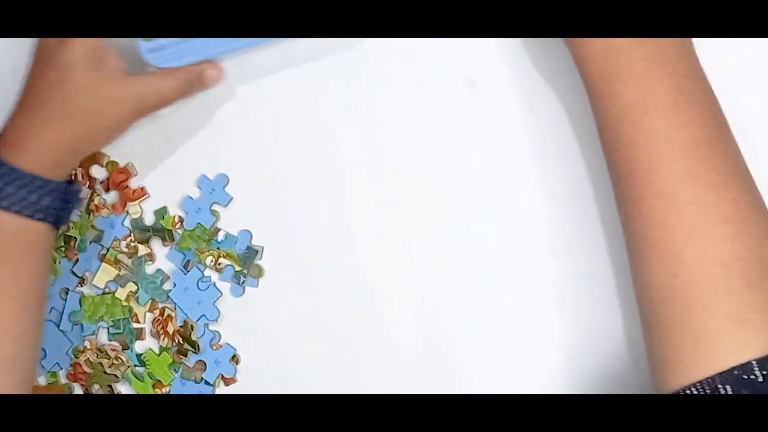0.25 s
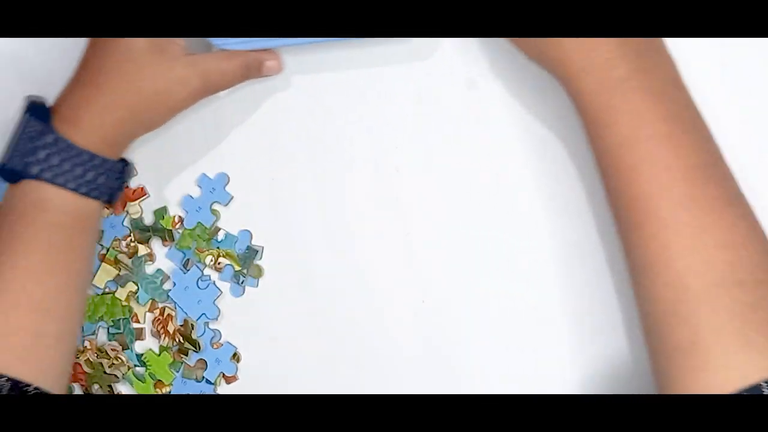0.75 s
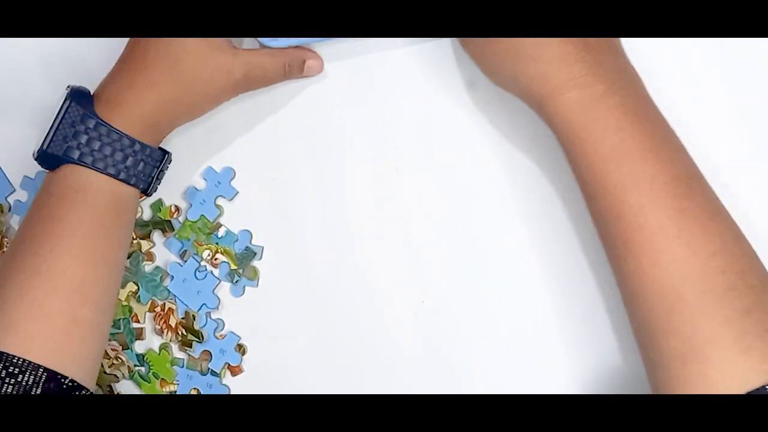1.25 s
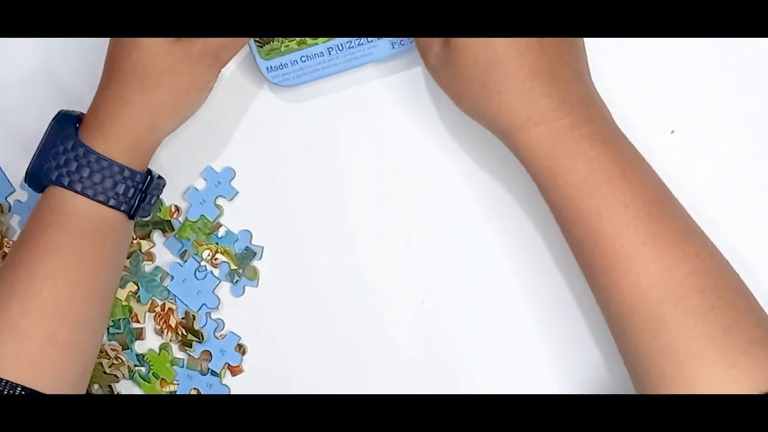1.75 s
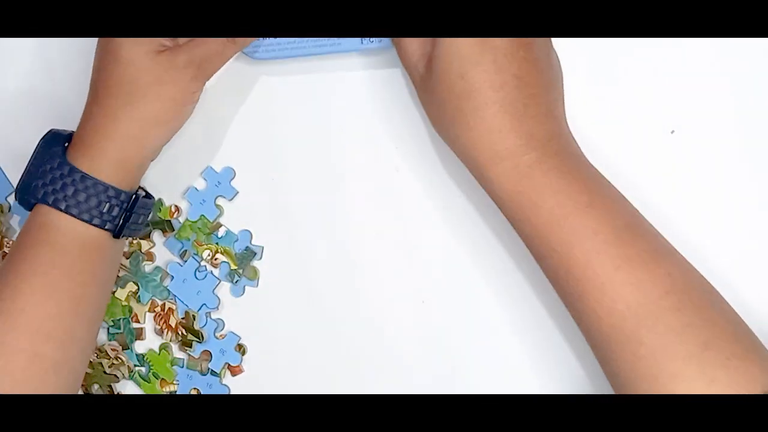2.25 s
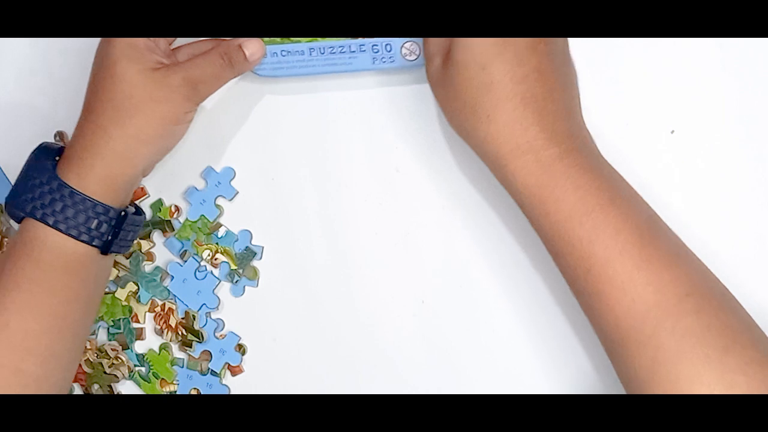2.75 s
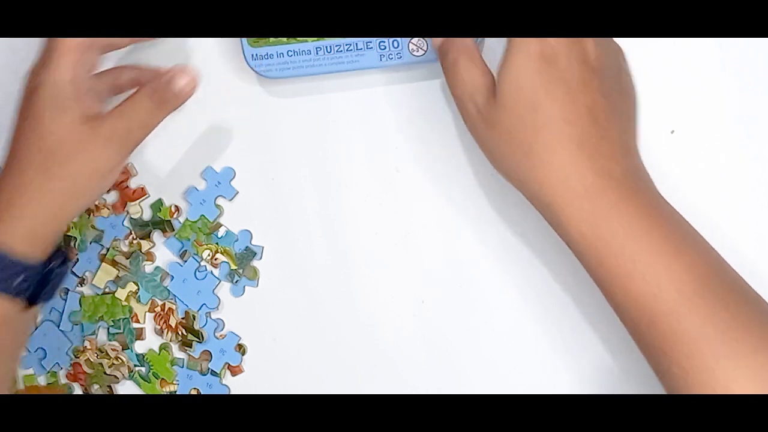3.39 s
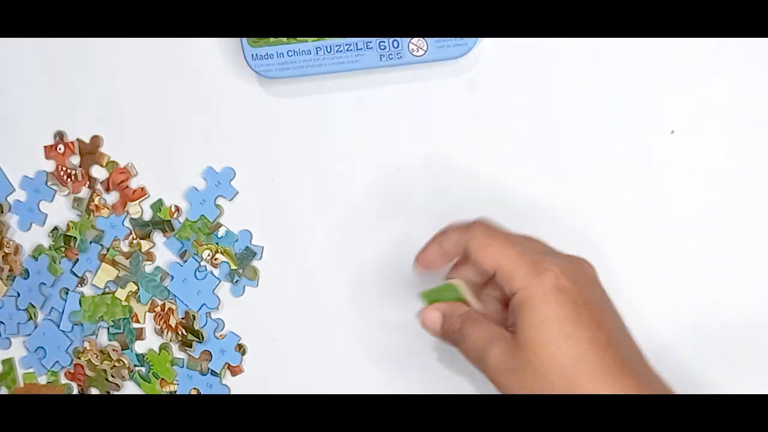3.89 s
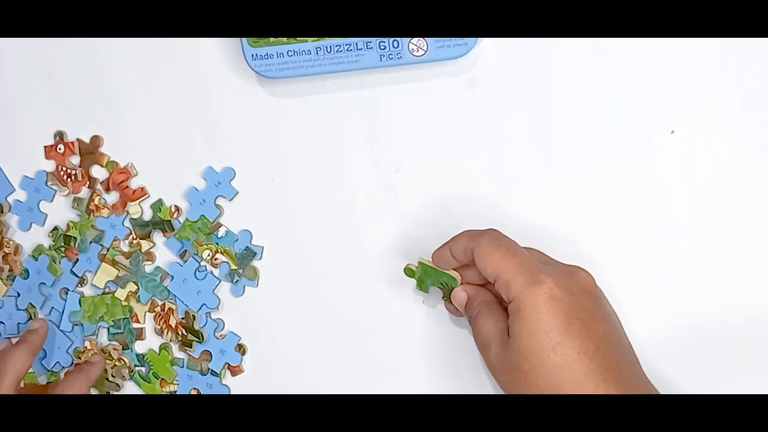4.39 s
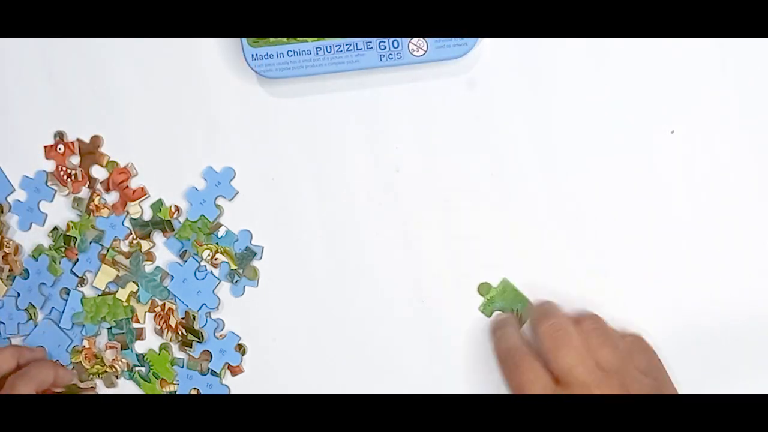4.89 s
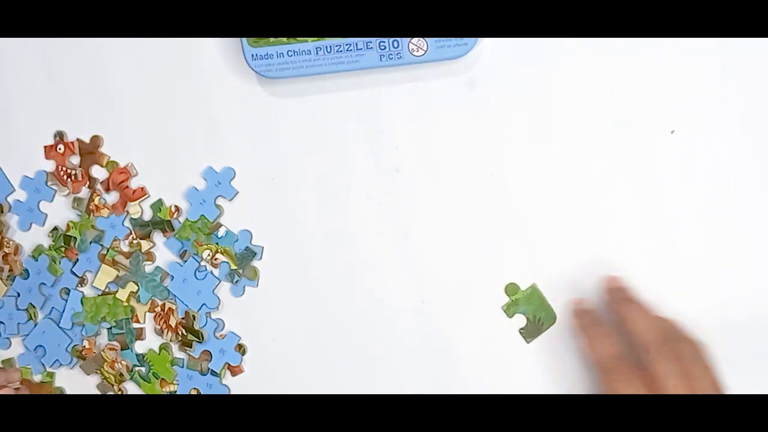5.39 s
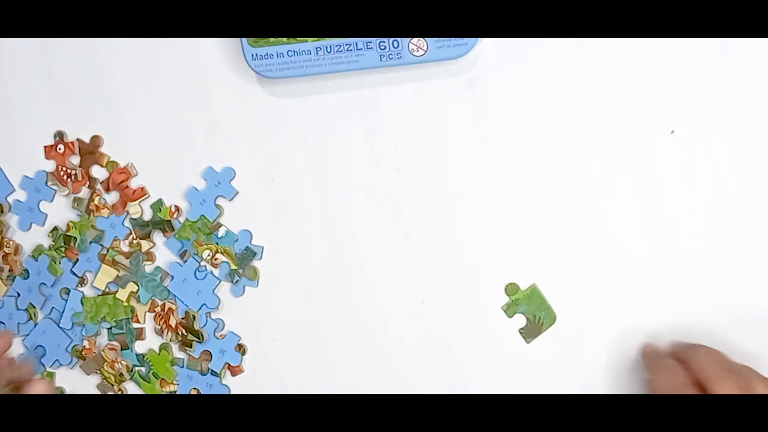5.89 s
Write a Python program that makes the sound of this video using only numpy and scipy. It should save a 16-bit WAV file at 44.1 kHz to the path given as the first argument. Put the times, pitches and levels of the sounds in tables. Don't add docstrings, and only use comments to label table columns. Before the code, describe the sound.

A close microphone on the table catches thin tin clanking irregularly in two hands, each knock ringing with a slightly different colour. Soft scraping and low thumps from leaning arms run beneath. Then the metal stops, leaving light finger rubs, a cluster of dead cardboard clicks, near quiet, and a last flat tap in a lightly reverberant room.

```python
import sys
import numpy as np
from scipy import signal
from scipy.fft import rfft, irfft, next_fast_len
from scipy.io import wavfile
from scipy.ndimage import uniform_filter1d

SR = 44100
rng = np.random.default_rng(int(sys.argv[2]) if len(sys.argv) > 2 else 0)


def how_loud(loudness_db):
    steps = np.asarray(loudness_db, float) / 20
    return 10 ** steps


def digitize_waveform(pressure):
    field = np.atleast_2d(pressure).T
    bounded = np.clip(field, -1, 1)
    quanta = np.round(bounded * 32767).astype(np.int16)
    wavfile.write(sys.argv[1], SR, quanta)


N = 270763

HARD_BLOW_HZ = [60, 220, 1000, 2700, 7000, 8600, 15000]


def evened(x):
    return x / np.sqrt(np.mean(x ** 2) + 1e-20)


def add(mix, start_s, sound):
    part = mix[round(start_s * SR):][:len(sound)]
    part += sound[:len(part)]


def coloured(x, points, size=4096):
    points_hz, points_db = np.transpose(points)
    hz = abs(np.fft.fftfreq(size, 1 / SR))
    gain_db = np.interp(np.log(hz + 1), np.log(points_hz + 1), points_db)
    spectrum = np.exp(np.conj(signal.hilbert(np.log(how_loud(gain_db)))))
    taps = np.fft.ifft(spectrum).real[:size // 2]
    return signal.oaconvolve(x, taps)[:len(x)]


def resonated(x, peaks):
    hz = np.fft.rfftfreq(len(x), 1 / SR)
    gain = sum(how_loud(db) / (1 + 2j * (hz - f) / max(width, 8, f / 45)) for f, width, db in peaks)
    return irfft(rfft(x) * gain, len(x))


def dying(x, t60_points, factor):
    t, hz = np.arange(len(x)) / SR, np.fft.rfftfreq(len(x), 1 / SR)
    centres, t60s = np.transpose(t60_points)
    spectrum = rfft(x)
    out = np.zeros(len(x))
    for one_band, t60 in zip(np.eye(len(centres)), t60s):
        share = np.interp(np.log(hz + 1), np.log(centres), one_band)
        out += irfft(spectrum * share, len(x)) * how_loud(-60 * t / max(t60 * factor, .005))
    return out


def air():
    # hz, level_db per Hz
    density = [(20, -100), (50, -91.5), (100, -100), (200, -99), (500, -108), (1000, -115), (2000, -119),
               (4000, -121), (8000, -122), (16000, -122)]
    return coloured(rng.standard_normal(N), density, size=16384) * np.sqrt(SR / 2)


def room(x):
    # hz, t60_s
    decay = [(150, .2), (400, 0.27), (1000, 0.43), (4000, 0.4), (8000, 0.14), (15000, 0.41)]
    taps = np.zeros(SR // 2)
    at = np.arange(200, len(taps) - 20, 16)
    taps[at + rng.integers(0, 16, len(at))] = rng.choice([-1., 1.], len(at))
    build_up = (1 - np.exp(-np.arange(len(taps)) / SR / 0.0068)) ** 2
    tail = dying(taps, decay, 0.87) * build_up
    return signal.oaconvolve(x, tail / np.linalg.norm(tail))[:N]


def effort(level_db, slope):
    # time_s, effort_db
    hands = [(0, -2.5), (.25, -7), (.4, -1), (.7, -6), (1.2, 0), (1.6, -2.5), (1.85, -1.5), (2.05, 2.5),
             (2.4, -4), (2.62, -1.5), (2.9, -2.5), (3.25, -2.5), (3.6, -2.5), (4.3, -6.5), (4.55, -5),
             (5.0, -3), (5.4, -9), (6.14, -12.5)]
    time_s, effort_db = np.transpose(hands)
    return how_loud(level_db + slope * np.interp(np.arange(N) / SR, time_s, effort_db))


def leans(layer):
    # start_s, hold_s, sway_db, shake_db, panel_db
    arm_leans = [(0.067, 0.023, -52, -53.5, -61), (0.447, .05, -72, -54, -78), (0.486, 0.1, -71, -47, -86),
                 (0.685, 0.021, -65, -61, -85), (0.87, 0.091, -71, -63, -60), (1.015, 0.078, -62, -48, -73),
                 (1.159, 0.087, -54.5, -49.5, -60), (1.36, 0.043, -74, -63, -72),
                 (1.95, 0.019, -73, -50.5, -68), (2.11, 0.073, -72, -55, -61),
                 (2.247, 0.089, -80, -54, -58.5), (2.383, 0.075, -80, -58.5, -60),
                 (2.698, 0.033, -76, -55, -59), (2.787, 0.19, -62, -58.5, -60.5),
                 (3.056, 0.2, -69, -67.5, -58.5), (3.329, 0.037, -46, -64, -68),
                 (3.424, 0.094, -57, -56.5, -79), (3.629, 0.11, -57.5, -60, -72),
                 (3.725, 0.094, -55, -53, -70), (4.156, 0.11, -59.5, -64.5, -85),
                 (4.67, 0.034, -73, -76, -69), (5.07, .12, -72, -66, -74), (5.921, 0.038, -77, -60.5, -60),
                 (6.031, 0.043, -51, -60.5, -77)]
    rumble_db = [-71, -64.5, -68]
    rumble_slopes = [.6, 0.88, 0.94]
    rise_s, fade_db_per_s = 0.011, 160
    power = effort(rumble_db[layer], rumble_slopes[layer]) ** 2
    t = np.arange(SR // 2) / SR
    for start_s, hold_s, *level_db in arm_leans:
        fade_db = fade_db_per_s * np.maximum(t - rise_s - hold_s, 0)
        gain = np.minimum(t / rise_s, 1) * how_loud(level_db[layer] - fade_db)
        add(power, start_s - rise_s / 2, gain ** 2)
    return np.sqrt(power)


def shaken(peaks):
    pushes = rng.standard_normal(next_fast_len(N))
    x = resonated(resonated(pushes, peaks), peaks)
    return evened(x / abs(signal.hilbert(x)) ** 0.8)[:N]


def table():
    # hz, width_hz, level_db
    sway = [(29.3, 13, 0)]
    # hz, width_hz, level_db
    shake = [(48.5, 6.6, -2), (67.5, 4.3, -1)]
    # hz, width_hz, level_db
    panel = [(108, 72, -1), (155.5, 71, 5.5), (228, 190, -7), (346, 520, -1)]
    return sum(leans(layer) * shaken(peaks) for layer, peaks in enumerate([sway, shake, panel]))


def strokes(column):
    # start_s, length_s, fine_rub_db, drag_db
    long_strokes = [(0.517, 0.33, -71, -70), (0.773, 0.11, -77, -55.5), (1.065, 0.2, -65, -67),
                    (1.462, 0.15, -70, -60), (1.862, 0.31, -68.5, -61.5), (2.245, 0.26, -73.5, -78),
                    (2.45, 0.23, -86, -68.5), (2.638, 0.081, -67, -54), (3.126, 0.3, -74, -89),
                    (3.282, 0.34, -66.5, -77.5), (3.797, 0.35, -72, -80), (4.364, 0.32, -68.5, -77.5),
                    (4.723, 0.65, -80, -93)]
    rub_db = [-72, -76.5]
    rub_slopes = [1.1, 1.6]
    power = effort(rub_db[column - 2], rub_slopes[column - 2]) ** 2
    for row in long_strokes:
        swell = np.hanning(round(row[1] * SR))
        add(power, row[0], (how_loud(row[column]) * swell) ** 2)
    return np.sqrt(power)


def scrapes(column):
    # start_s, length_s, fine_rub_db, drag_db, peak_place (0-1)
    short_scrapes = [(0.046, 0.14, -65, -68, 0.05), (0.42, 0.072, -57, -63.5, 0.07),
                     (0.482, 0.014, -45.5, -47.5, 0.85), (1.024, 0.057, -50, -50.5, 0.4),
                     (1.339, 0.036, -81, -56, 0.7), (1.713, 0.14, -71.5, -69, 0.23),
                     (1.97, 0.061, -79, -83, 0.3), (2.679, 0.051, -62, -50, 0.1),
                     (2.891, 0.013, -88, -62, .8), (3.418, 0.079, -65, -79, 0.3),
                     (3.897, 0.077, -73.5, -79.5, 0.45), (4.383, 0.07, -63, -76, 0.25),
                     (4.58, 0.041, -66.5, -83, 0.66), (4.632, 0.019, -68.5, -86, 0.33),
                     (4.685, 0.041, -58.5, -70, 0.2), (4.741, 0.043, -59, -72, 1),
                     (4.918, 0.028, -62, -93.5, 0.8), (5.045, 0.1, -59, -73, 0.1),
                     (5.144, 0.094, -68.5, -77, 0.5), (5.27, 0.045, -72, -87.5, 0.58),
                     (5.568, 0.079, -77, -87.5, 0.56), (5.925, 0.069, -68, -69, 0.2),
                     (6.014, 0.019, -68, -69, 0.53), (6.03, 0.062, -73, -80, 0.16)]
    out = np.zeros(N)
    for row in short_scrapes:
        u = np.linspace(0, 1, round(row[1] * SR))
        swell = np.interp(u, [0, np.clip(row[4], .05, .95), 1], [.45, 1, .33])
        add(out, row[0], how_loud(row[column]) * swell * signal.windows.tukey(len(u), .25))
    return out


def rubbing():
    # hz, level_db
    fine_colour = [(1500, -30.5), (3000, -3), (5000, 2), (8000, 8), (12000, -4), (16000, -4)]
    # hz, level_db
    drag_colour = [(200, -10), (500, 7), (1200, 0), (2500, -3.5), (4500, -16), (9000, -35.5)]
    # hz, width_hz, level_db
    tin_hum = [(893, 59, 3.5), (1335, 14, 1), (2260, 43, -8), (2940, 230, -8.5), (3670, 49, -8),
               (4500, 34, -10.5)]
    tin_left_s = 3.1
    size = next_fast_len(N)
    clumps = evened(uniform_filter1d(rng.standard_normal((2, size)), 700, axis=1))
    catch_db = 2.4 * rng.exponential(1, (2, size)).clip(0, 5) + 0.56 * clumps
    catches = rng.standard_normal((2, size)) * how_loud(catch_db)
    on_tin = np.arange(N) < tin_left_s * SR
    fine = evened(coloured(catches[0], fine_colour))[:N]
    drag = evened(coloured(catches[1], drag_colour))[:N]
    drag += how_loud(-4.0) * on_tin * evened(resonated(catches[1], tin_hum))[:N]
    return np.hypot(strokes(2), scrapes(2)) * fine + np.hypot(strokes(3), scrapes(3)) * drag


def hollow():
    # start_s, length_s, from_hz, to_hz, level_db
    hums = [
        (3.222, 0.29, 1247, 1398, -81),
        (3.55, 0.37, 779, 930, -79.5),
        (3.908, 0.22, 1930, 1881, -83.5),
        (4.183, 0.27, 2084, 2032, -81),
        (4.461, 0.12, 2100, 2567, -77),
        (4.578, 0.064, 2107, 1953, -79),
        (5.917, 0.06, 4170, 3900, -76),
        (6.041, 0.061, 3940, 4020, -87),
    ]
    narrow_hz, wide_hz = 90, 380
    narrow = evened(signal.lfilter(*signal.butter(2, narrow_hz / SR), rng.standard_normal((4, N))))
    wide = evened(signal.lfilter(*signal.butter(2, wide_hz / SR), rng.standard_normal((2, N))))
    hz, gain = np.zeros(N), np.zeros(N)
    for start_s, length_s, from_hz, to_hz, level_db in hums:
        start, count = round(start_s * SR), round(length_s * SR)
        hz[start:start + count] = np.linspace(from_hz, to_hz, count)
        add(gain, start_s, how_loud(level_db) * signal.windows.tukey(count, 0.21))
    angle = 2 * np.pi * np.cumsum(hz) / SR
    slow = np.where(hz > 1600, wide, narrow[:2])
    upper = slow[0] * np.cos(angle) + slow[1] * np.sin(angle)
    lower = narrow[2] * np.cos(angle / 2) + narrow[3] * np.sin(angle / 2)
    return gain * (upper + how_loud(-5) * lower)


def blow(row, t60, band_hz, rise_s, snap, peaks=(), peaks_db=0, top_db=-4, crack=0.071):
    # hz, factor on t60
    ring_decay = [(120, 1.7), (350, 0.77), (1000, 0.97), (3000, 0.79), (7000, 1.046), (14000, 0.14)]
    start_s, treble_db, thud_db, body_db, wall_db = row
    t = np.arange(2 ** 14) / SR
    modes = rng.standard_normal(len(t)) * how_loud(3.6 * rng.standard_normal(len(t)))
    dense = dying(modes, ring_decay, t60)
    chatter = 1 + abs(crack) * np.exp(-t / 0.002)
    dense *= (1 - np.exp(-t / rise_s)) * chatter
    dense[2:5] -= snap
    level_db = [thud_db - 1.5, thud_db + 18, body_db + 9.5, wall_db - 8, treble_db - 10.5,
                treble_db - 8.0 + top_db, treble_db - 17.0 + top_db]
    sound = coloured(dense, np.transpose([band_hz, level_db]))
    if len(peaks):
        struck = 0.93 * dense * how_loud(-60 * t / (18.0 * t60))
        sound = sound + how_loud(max(level_db[2:5]) + peaks_db) * resonated(struck, peaks)
    return start_s, sound


def pieces():
    # start_s, treble_db, table_thud_db, body_db, edge_db
    ticks = [(3.6614, -46, -65, -86, -56), (4.6803, -33, -52, -57, -41), (4.6926, -27, -44, -73, -83.5),
             (4.749, -33.5, -49, -43.5, -36.5), (4.8689, -46, -79, -82, -67.5),
             (5.0036, -41, -66, -68, -62.5), (5.017, -58, -62.5, -69, -55), (5.1484, -54, -69, -84, -75.5),
             (5.253, -52.5, -61, -68.5, -59.5), (5.4876, -36, -63, -80, -88),
             (5.7689, -41.5, -72, -68, -77), (5.915, -33, -45, -45.5, -28.5), (5.9235, -50, -60, -57, -51),
             (5.9989, -33.5, -44, -54, -56), (6.0181, -53, -51, -60, -75), (6.04, -56, -72, -75, -67)]
    # hz, width_hz, level_db
    flat_card = [(1323, 110, -2.5), (2920, 210, -4), (3320, 190, -10), (5700, 450, -6.5), (6870, 87, -13),
                 (7200, 480, -5.5), (3940, 270, 0)]
    # start_s, level_db
    specks = [
        (5.146, -60),
        (5.171, -64),
        (5.266, -67),
        (5.585, -70),
        (5.6, -66),
        (5.615, -69),
    ]
    card_down_s = 5.9
    out = np.zeros(N)
    for row in ticks:
        peaks = flat_card if row[0] > card_down_s else ()
        add(out, *blow(row, 0.021, HARD_BLOW_HZ, rise_s=.0005, snap=.7, peaks=peaks, peaks_db=7.0))
    for start_s, level_db in specks:
        row = (start_s, level_db, -99, -99, -99)
        add(out, *blow(row, 0.0097, HARD_BLOW_HZ, rise_s=0.0003, snap=1.23, top_db=20))
    return out


def pops():
    # start_s, pitch_hz, level_db, t60_s
    single_modes = [(0.4985, 2100, -33, 0.038), (0.0645, 560, -51, 0.059), (0.7765, 540, -36.5, .05),
                    (1.027, 1217, -44, .2), (1.0545, 930, -20, .1), (1.0575, 1206, -25, 0.032),
                    (1.194, 260, -43.5, 0.092), (1.206, 887, -41, 0.062), (1.0545, 546, -29.5, 0.089),
                    (1.188, 12000, -61, .006), (1.437, 13000, -58, .006), (1.455, 13000, -51, .006),
                    (1.9515, 825, -38.5, 0.023), (2.1025, 940, -20.5, 0.0092), (2.108, 1250, -36.5, 0.038),
                    (2.1027, 1810, -32, 0.026), (2.2367, 1950, -26.5, 0.014), (2.2367, 930, -35.5, 0.068),
                    (2.681, 590, -39.5, .03), (2.9027, 6860, -23.5, 0.021), (3.081, 490, -49, .1),
                    (4.684, 148.2, -48, 0.066), (4.68, 2230, -54.5, 0.027), (4.749, 2265, -47, 0.016),
                    (4.748, 930, -51, .02), (4.753, 246, -48.5, 0.09), (5.9161, 1340, -52, 0.059),
                    (5.917, 258, -51.5, 0.1)]
    out, t = np.zeros(N), np.arange(2 ** 13) / SR
    for start_s, hz, level_db, t60 in single_modes:
        first_cycle = np.minimum(t * hz, 1)
        add(out, start_s, -how_loud(level_db - 60 * t / t60) * np.sin(2 * np.pi * hz * t) * first_cycle)
    return out


def lines(modes, level_db):
    rise_s, twin_db, split, longest_s = 0.0027, -5, 0.011, 0.26
    t = np.arange(2 ** 14) / SR
    ring = np.zeros(len(t))
    for k, (hz, db, t60) in enumerate(modes):
        sign = (-1) ** k
        twin_hz = hz * (1 + sign * split)
        pair = np.sin(2 * np.pi * hz * t) + how_loud(twin_db) * np.sin(2 * np.pi * twin_hz * t)
        ring += sign * how_loud(db - 60 * t / min(t60, longest_s)) * pair
    return how_loud(level_db) * (1 - np.exp(-t / rise_s)) * ring


def tin():
    # start_s, treble_db, table_thud_db, body_db, wall_db
    knocks = [(0.4977, -27, -34.5, -33, -12.5), (0.7753, -9, -59, -31, -17),
              (0.873, -22.5, -67, -39, -23.5), (1.054, -20, -53, -28.5, -24), (1.3632, -25, -60, -38, -29),
              (2.1026, -29, -44, -31, -26.5), (2.1096, -26, -50, -44, -31.5),
              (2.2363, -31, -45, -44, -26.5), (2.2545, -33.5, -43.5, -49, -38),
              (2.6862, -31.5, -46, -44, -35.5), (2.9034, -21, -57.5, -34.5, -22.5)]
    # start_s, treble_db, table_thud_db, box_db, body_db
    bumps = [(0.0655, -40.5, -62, -37, -46.5), (0.429, -59.5, -29, -79, -52), (0.8993, -37, -37, -39, -19),
             (1.1876, -53, -52, -33, -24), (1.2121, -42, -44, -32, -17), (1.5787, -57, -47, -45, -33),
             (1.7388, -82, -68.5, -44, -52.5), (1.8289, -49, -80, -48, -38), (1.951, -80, -57, -36, -28),
             (2.062, -40, -46, -42, -21), (2.5316, -62, -54, -74, -61), (3.0731, -41, -53.5, -29, -49),
             (3.113, -49, -45.5, -36, -52.5), (3.689, -70.5, -54, -47, -51)]
    bump_hz = [60, 190, 480, 1050, 3200, 6000, 15000]
    grip_s = [0, .7, .85, 1.0, 1.3, 1.9, 2.2, 2.6, 2.8]
    # hz, width_hz, level_db
    earlier_grips = [
        [(1050, 140, -2), (1398, 53, -2.5), (1980, 160, -3.5), (2420, 130, -6.5), (3128, 60, -6.5),
         (3800, 190, -10.5), (4820, 93, -12), (4200, 150, -16), (6000, 36, -14.5), (7100, 22, -19),
         (7490, 23, -21)],
        [(1094, 140, -8), (2900, 36, -9), (3047, 28, -8), (4180, 210, 0), (4470, 44, -4.5), (4600, 160, 0),
         (5920, 41, -10.5), (6200, 13, -6), (6980, 54, -2), (7550, 40, -0.5), (8700, 33, -16), (10900, 37, -13)],
        [(1270, 120, 0), (3050, 26, -6), (4380, 51, -18), (5900, 84, -7.5), (6960, 46, -11.5),
         (7600, 130, -5.5)],
        [(930, 45, 5), (1250, 150, -5), (1849, 140, -6.5), (2440, 130, -14), (3064, 240, -8.5),
         (3630, 15, -22.5), (4050, 32, -24), (4940, 34, -16), (6200, 33, -22.5)],
    ]
    # hz, width_hz, level_db
    later_grips = [
        [(1074, 99, 2.5), (1970, 32, -8), (2500, 320, -15.5), (4940, 29, -26), (6005, 340, -18),
         (7300, 41, -11.5)],
        [(1270, 97, -14), (3060, 150, -14), (7360, 74, -27)],
        [(1007, 103, 1.5), (1860, 320, -4), (3100, 85, -5), (4800, 23, -15), (6070, 62, -11.5), (7250, 54, -6)],
        [(2360, 70, -6), (1130, 70, -25.5), (7150, 41, -29)],
        [(936, 55, -5), (2978, 35.5, -10), (5140, 45, -15), (6250, 74, -3), (7090, 62, 0.5), (9500, 30, -10.5),
         (9730, 32, -6), (10900, 50, -8.5)],
    ]
    # hz, level_db, t60_s
    earlier_lines = [
        [(953, -11, 0.43), (1109, 0, 0.2), (1410, -6, 0.25), (2051, -13, 0.19), (2510, -13, 0.2),
         (2595, -11, 0.38), (3133, -4, 0.14), (3951, -7, 0.18), (4737, -14, 0.21), (5249, -11, 0.18),
         (5383, -11, 0.18), (6751, -10, 0.17), (1330, -8, 0.3)],
        [(1034, -19, 0.41), (3009, -13, 0.19), (3817, -17, 0.29), (4097, -17, 0.29), (4554, -9, 0.14),
         (4883, -14, 0.2), (5582, -12, 0.18), (5846, -11, 0.14), (6686, 0, 0.071), (7117, -11, 0.16),
         (7580, -1, 0.085)],
        [(942, -16, 0.73), (1270, 0, 0.15), (2051, -18, 0.4), (3160, -7, 0.2), (4280, -7, 0.11),
         (5491, -9, 0.14), (5545, -15, 0.22), (6298, -10, 0.18), (6535, -11, 0.23), (7585, -18, 0.26)],
        [(1157, 1, 0.26), (937, 1, 0.26), (1825, -4, 0.17), (3424, -18, 0.29), (3612, -12, 0.16),
         (4334, -14, 0.16), (5076, -4, 0.11), (5480, -13, 0.21), (6207, 0, 0.11), (7020, -11, 0.22),
         (7327, -18, 0.21), (7698, -18, 0.3), (8306, -15, 0.13)],
    ]
    # hz, level_db, t60_s
    later_lines = [
        [(942, -13, 0.28), (1152, 0, 0.15), (1981, -16, 0.16), (2595, -20, 0.38), (3144, -19, 0.26),
         (5082, -19, 0.31), (5351, -13, 0.18), (5706, -8, 0.15), (6428, -7, 0.15), (7375, -15, 0.2)],
        [(1071, 0, 0.12), (1938, -12, 0.34), (3725, -15, 0.18), (4667, -10, 0.15), (6110, -16, 0.18),
         (7052, -6, 0.089), (7876, -18, 0.21)],
        [(937, -11, 0.29), (2073, -6, 0.08), (2519, -16, 0.21), (3246, -13, 0.18), (3822, -21, 0.33),
         (5076, -16, 0.19), (6002, -10, 0.14), (7068, -20, 0.22), (7294, -12, 0.11), (7617, -16, 0.17),
         (8419, -13, 0.092)],
        [(861, -4, 0.15), (1340, -5, 0.2), (2385, 2, 0.12), (3817, -5, 0.15), (4840, -9, 0.13),
         (5394, -13, 0.21), (7122, -4, 0.15)],
        [(910, -14, 0.15), (3456, -17, 0.23), (4070, -20, 0.24), (5453, -13, 0.26), (5911, -18, 0.2),
         (6099, 0, 0.092), (6417, -10, 0.16), (7025, -10, 0.22), (7434, -12, 0.15), (8043, -14, 0.14)],
    ]
    grip_db = [12, 4.9, 9.4, 8.5, 5, 3, 7.8, 3.3, 3.6]
    grip_t60 = [0.22, 0.12, .11, .18, 0.22, 0.072, 0.15, 0.12, 0.21]
    lines_db = [-30.5, -29, -38, -38.5, -35, -45, -47, -53, -32]
    top_db = [-10.5, -5, 2.5, -2, -1, 0.5, -9.5, -3.5, -2]
    crack = [0.24, 0.35, 0.43, .8, 0.076, 0.63, 0.63, 0.25, 1.5]
    resonances, thin_modes = earlier_grips + later_grips, earlier_lines + later_lines
    out = np.zeros(N)
    for row in knocks:
        g = np.searchsorted(grip_s, row[0]) - 1
        add(out, *blow(row, grip_t60[g], HARD_BLOW_HZ, 0.0014, 3.1, resonances[g], grip_db[g],
                       top_db[g], crack[g]))
    for g, start_s in enumerate(grip_s):
        first_knock_s = min(row[0] for row in knocks if row[0] > start_s)
        add(out, first_knock_s, lines(thin_modes[g], lines_db[g]))
    for row in bumps:
        add(out, *blow(row, 0.068, bump_hz, rise_s=0.0074, snap=1.3))
    return out


def scene():
    near = tin() + pops() + pieces() + rubbing() + hollow()
    return (near + how_loud(-8.5) * room(near) + table() + air())[None]


def roll_off(x):
    return signal.sosfilt(signal.butter(12, 16640, fs=SR, output="sos"), x)


def record(dry):
    # hz, level_db
    response = [(20, -1), (3000, 0), (4800, 0.5), (6800, 4), (8200, -2), (9300, -2), (10800, 3.5),
                (12500, -3), (16000, -2)]
    band_limit = signal.firwin(255, 15800, window=("kaiser", 7), fs=SR)
    limited = signal.oaconvolve(coloured(dry[0], response), band_limit, "same")
    return roll_off(limited[None])


dry = scene()
out = record(dry)
digitize_waveform(out)
```